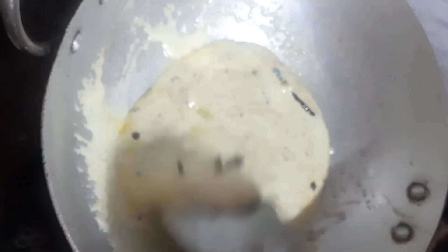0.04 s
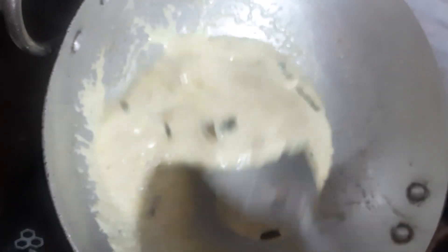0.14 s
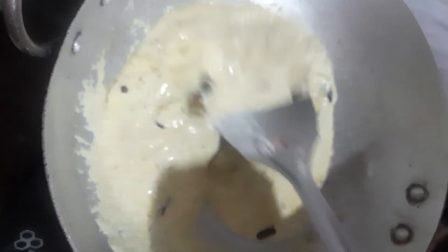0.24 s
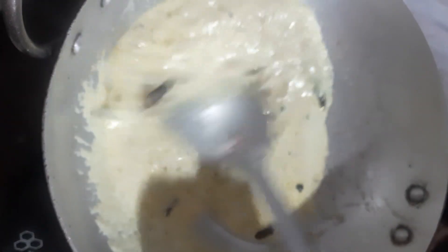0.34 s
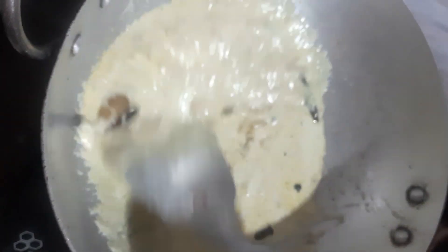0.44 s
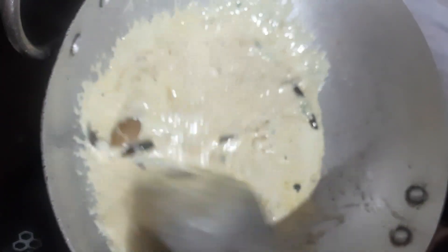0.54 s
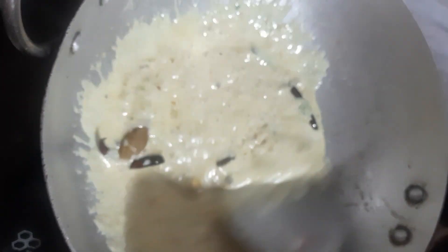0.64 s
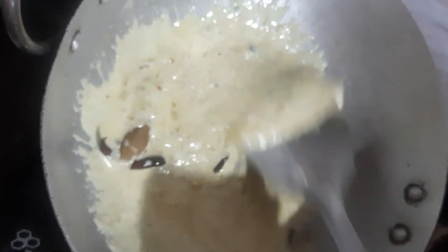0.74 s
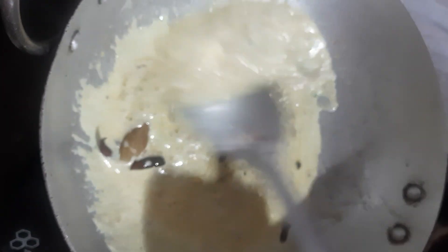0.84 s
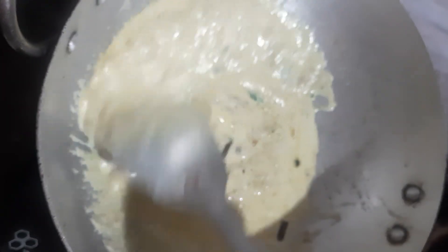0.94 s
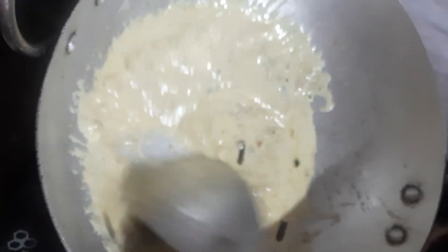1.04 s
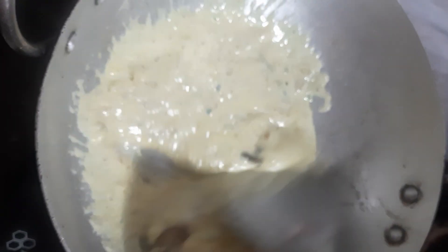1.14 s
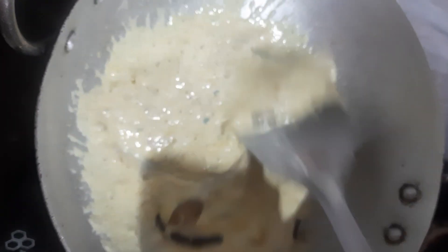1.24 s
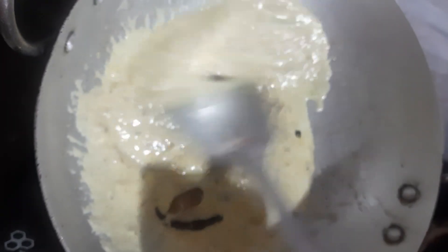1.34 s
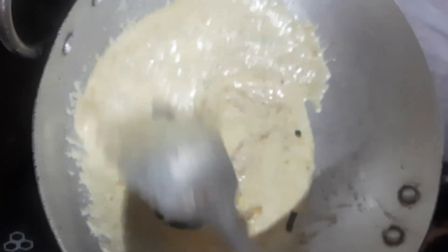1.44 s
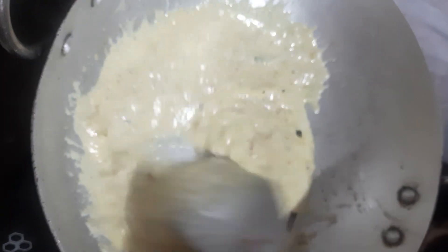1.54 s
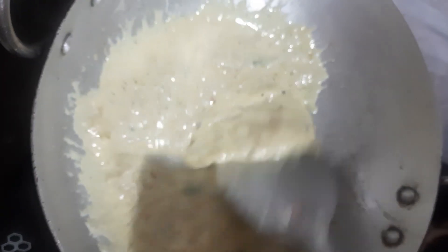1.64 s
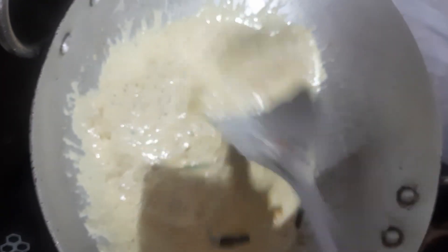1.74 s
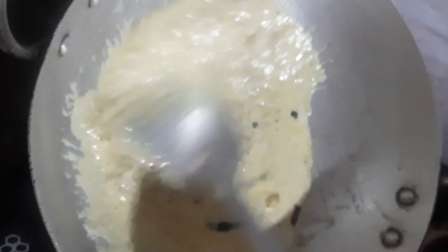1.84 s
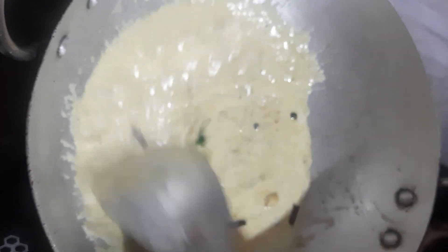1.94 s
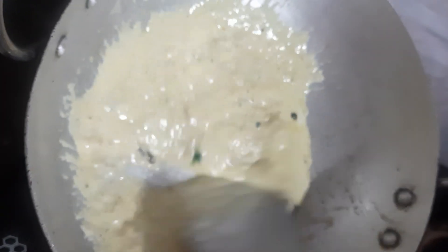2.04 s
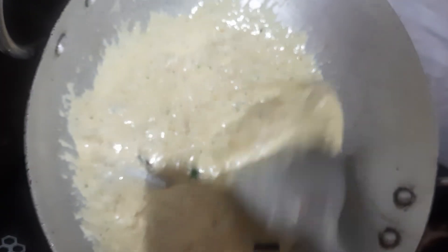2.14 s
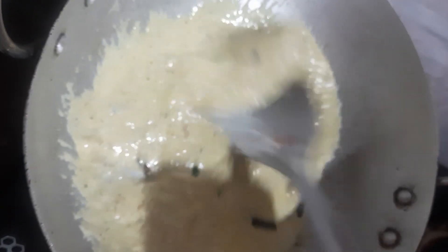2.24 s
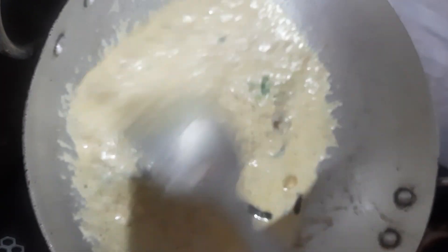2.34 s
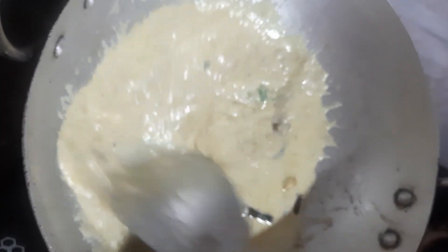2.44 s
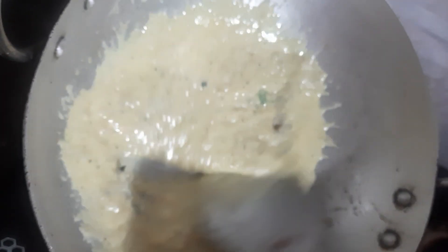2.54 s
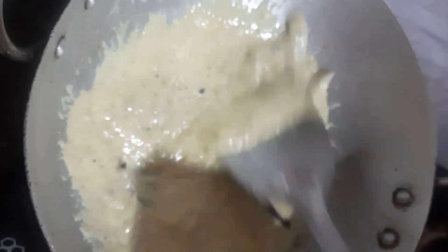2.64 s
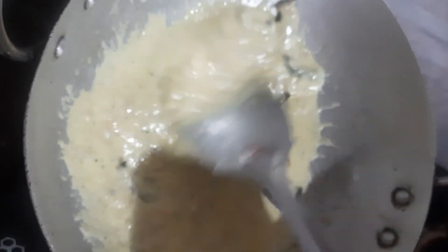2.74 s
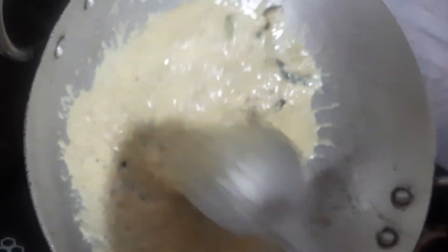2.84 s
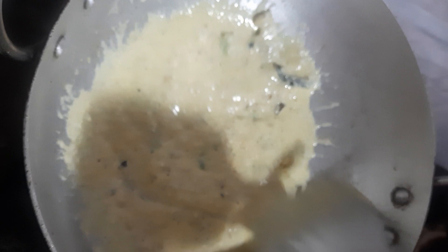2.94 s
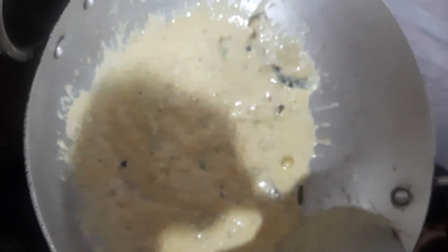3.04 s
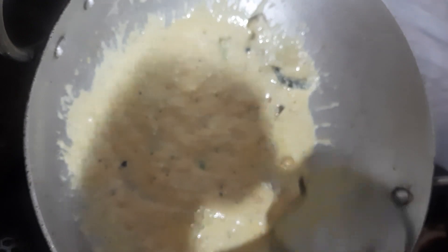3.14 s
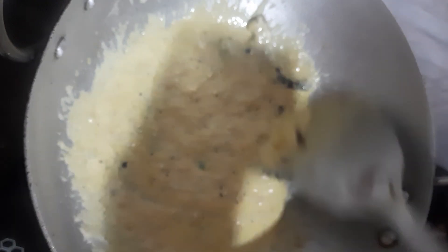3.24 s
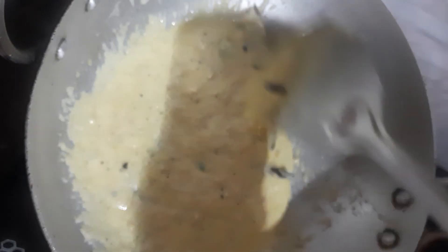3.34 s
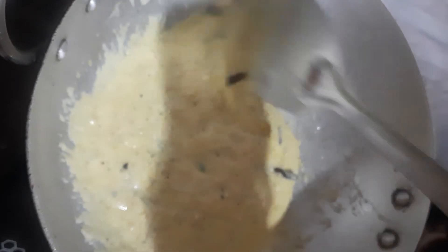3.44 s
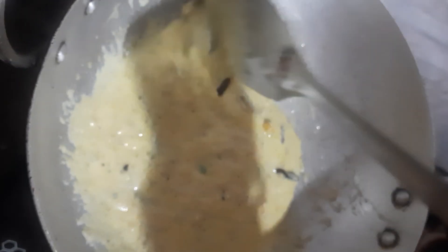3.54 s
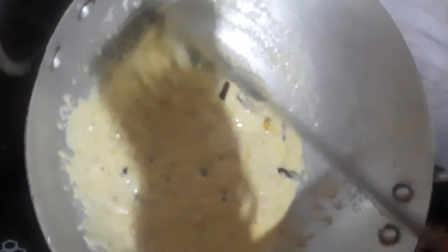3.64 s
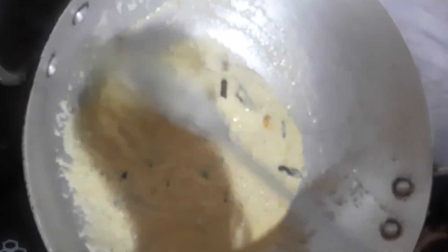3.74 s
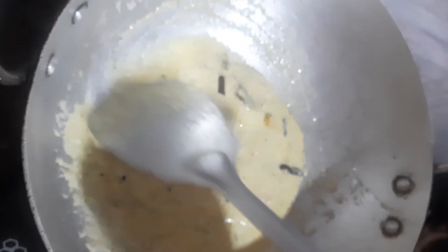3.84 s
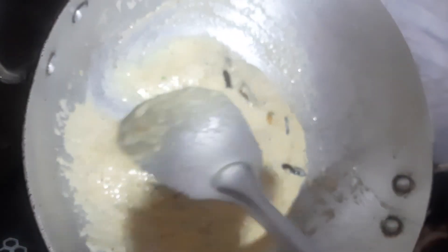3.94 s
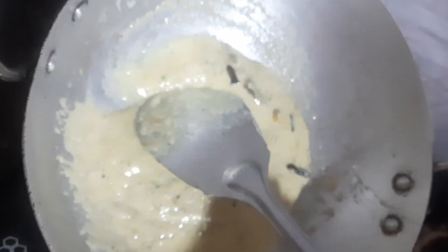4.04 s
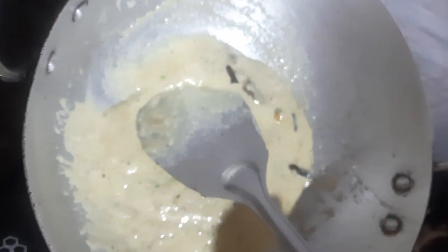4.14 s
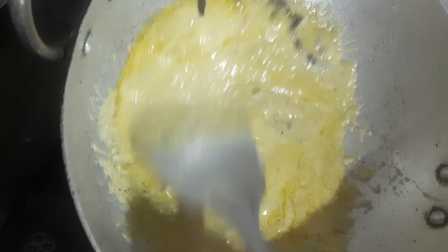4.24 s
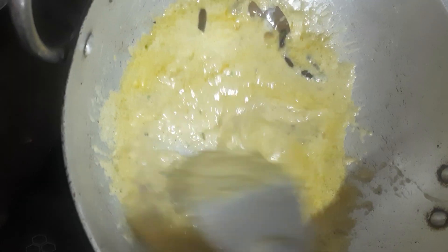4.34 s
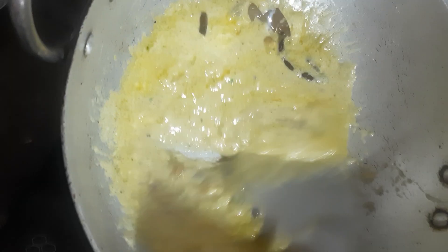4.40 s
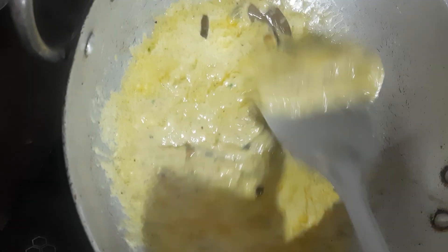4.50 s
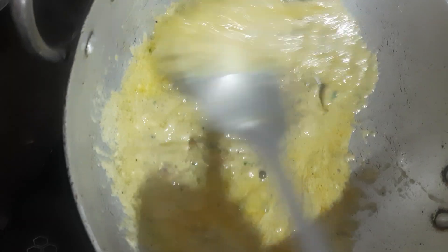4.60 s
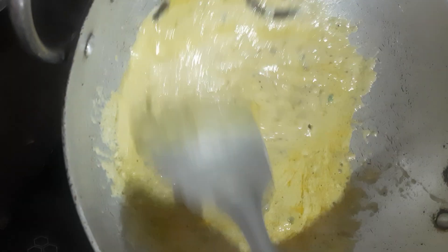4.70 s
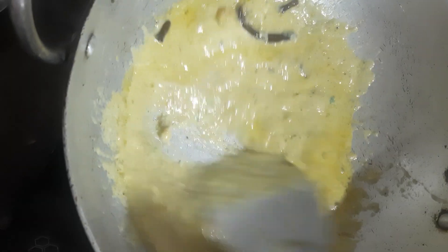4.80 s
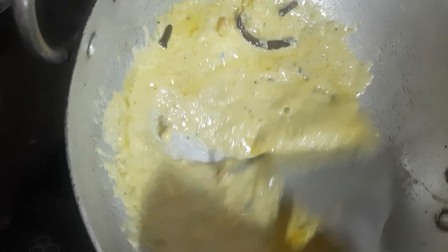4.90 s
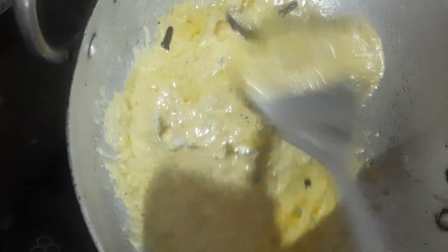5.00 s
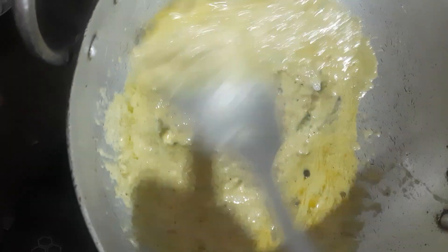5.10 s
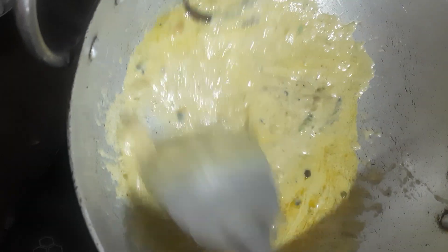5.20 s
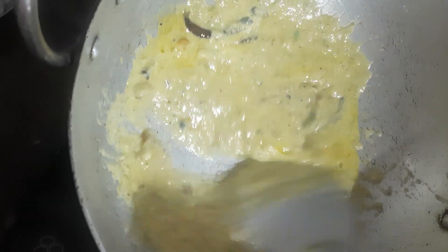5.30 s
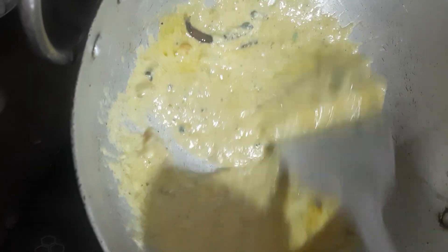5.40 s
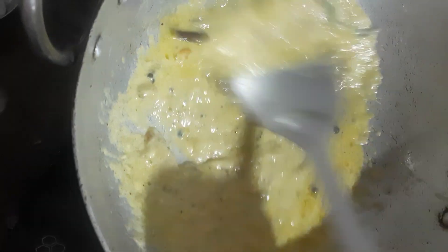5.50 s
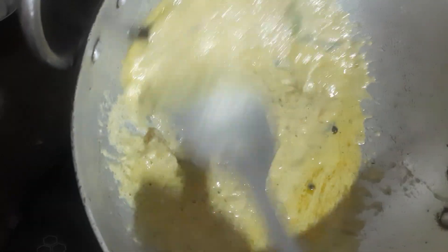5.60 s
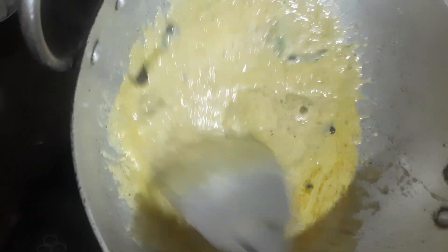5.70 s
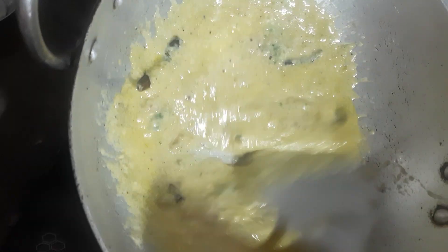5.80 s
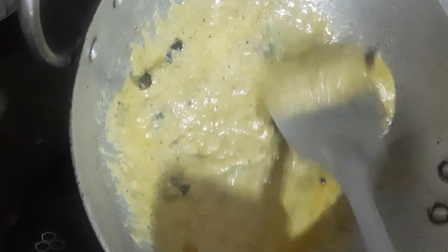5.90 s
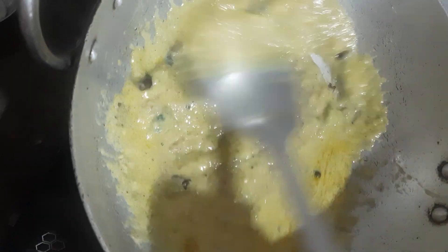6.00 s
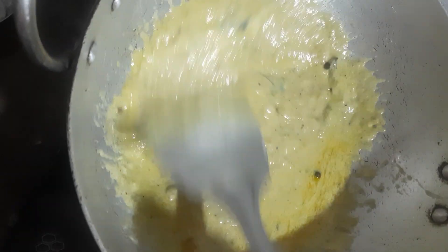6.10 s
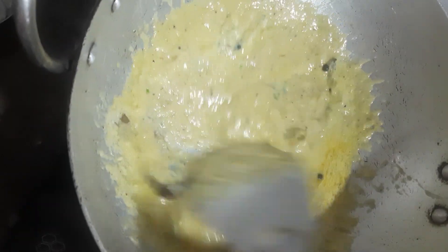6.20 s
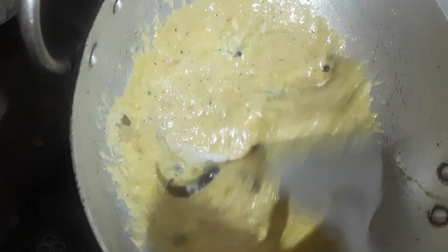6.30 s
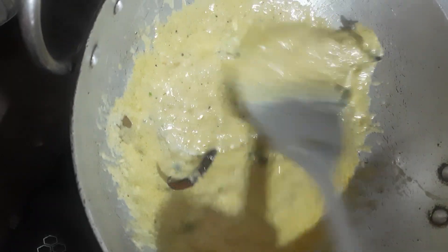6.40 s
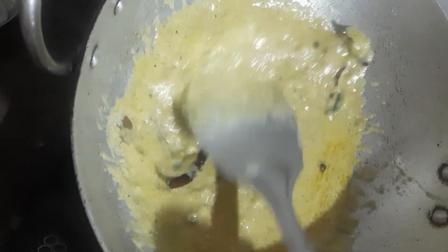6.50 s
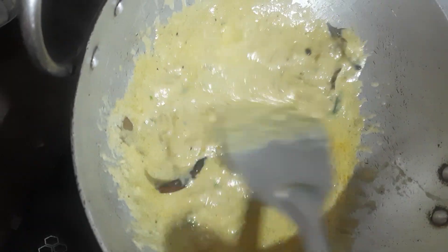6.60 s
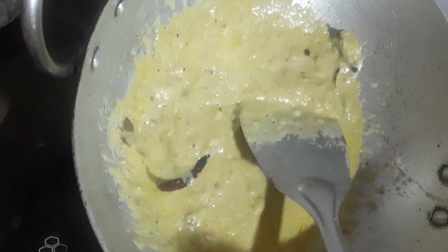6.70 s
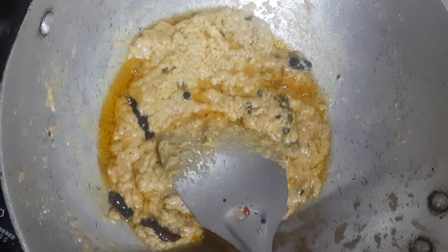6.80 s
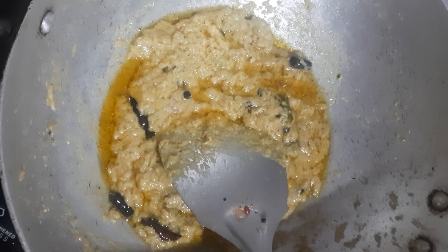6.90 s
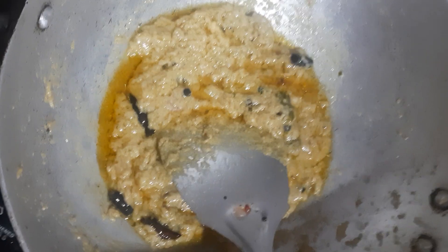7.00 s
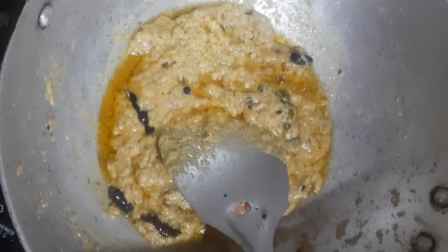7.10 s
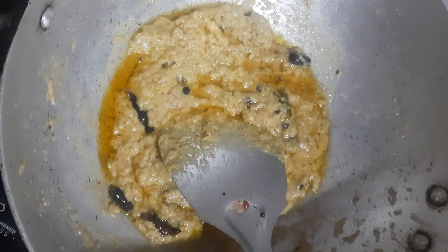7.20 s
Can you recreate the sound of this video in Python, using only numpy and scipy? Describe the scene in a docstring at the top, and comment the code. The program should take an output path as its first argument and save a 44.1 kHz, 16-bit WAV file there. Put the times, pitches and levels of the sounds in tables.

```python
"""In a kitchen, close under a pair of microphones, a steel spoon stirs a thick paste in a round metal pan.
Stick-slip friction and knocks excite the resonant modes of bowl and blade; the edge also rasps without ringing.
Air pockets pop as decaying sine pulses. Behind them a burner roars low, as spectrally shaped noise, and
bubbles sizzle faintly as shaped trains of random impulses. Near the end the sound cuts abruptly to a louder,
steady frying hiss, shaped noise switched on at full level."""
import sys
import numpy as np
from scipy import signal
from scipy.fft import rfft, irfft, next_fast_len
from scipy.io import wavfile
from scipy.ndimage import uniform_filter1d, map_coordinates

SR = 44100
rng = np.random.default_rng(int(sys.argv[2]) if len(sys.argv) > 2 else 0)


def store_wav(level_fs):
    """Save 16-bit WAV to argv[1]."""
    pcm = np.round(np.clip(np.atleast_2d(level_fs), -1, 1) * 32767)
    wavfile.write(sys.argv[1], SR, pcm.T.astype(np.int16))


N = 319783

# Strokes of the spoon: landing t/s, length/s, relative levels of the scrape of the edge/dB, of the weight on
# the bowl/dB and of the edge felt by the bowl/dB, swell from landing to lift/dB, favoured upper bowl pitch f/Hz
STROKE_ROWS = [(0, 0.1, -42, -45, -38, 4, 1580), (0.096, 0.12, -41, -46.5, -37.5, 2, 860),
               (0.208, 0.099, -41, -38.5, -35.5, -10.5, 1000), (0.283, 0.16, -51.5, -55.5, -52, 6.5, 1210),
               (0.469, 0.098, -53, -43, -49.5, -1, 830), (0.577, 0.1, -42.0, -44.5, -50.5, -8.5, 1380),
               (0.727, 0.2, -44.5, -46.5, -39.5, -5, 1150), (0.93, 0.11, -47.5, -44.5, -47, 8.5, 1140),
               (1.1, 0.012, -40.5, -44, -54, 1, 1434), (1.122, 0.025, -37, -41.5, -45, 1, 1410),
               (1.202, 0.18, -42, -43, -43, 2, 1230), (1.399, 0.071, -44.5, -49.5, -48, 6.5, 1810),
               (1.494, 0.17, -38.5, -40.5, -48.5, -3, 1220), (1.676, 0.098, -40.5, -45, -41, 6, 1630),
               (1.759, 0.048, -41, -36.5, -30.5, -7, 1200), (1.82, 0.089, -43, -53, -56, -1.5, 1340),
               (1.915, 0.15, -59.5, -43.5, -52, -2.5, 846), (2.076, 0.085, -44, -46, -67, -10, 1370),
               (2.148, 0.22, -44, -43, -42.5, -6.5, 1220), (2.451, 0.1, -41, -39.5, -47.5, -8, 1000),
               (2.575, 0.12, -46.5, -46.5, -65, 6, 1270), (2.66, 0.12, -38.5, -44.5, -38.5, -1.5, 1280),
               (3.081, 0.012, -27, -31.5, -26, -2.5, 1920), (3.093, 0.024, -46, -36, -22.5, -7, 2000),
               (3.133, 0.11, -40.5, -42, -34.5, -3, 1370), (3.234, 0.14, -38, -43.5, -31.5, 2, 1040),
               (3.383, 0.16, -37, -43, -29.5, -5, 857), (3.537, 0.028, -39, -20.5, -25, 0, 1010),
               (3.584, 0.083, -41.5, -24, -22, 4, 1080), (3.711, 0.052, -44, -39, -30, -6, 950),
               (3.801, 0.17, -42.5, -44, -41.5, -5.5, 1160), (4.175, 0.038, -43, -39, -45, -9, 1480),
               (4.36, 0.043, -73, -67, -79, -6, 1150), (4.566, 0.044, -47.5, -41.5, -45, -7.5, 920),
               (4.626, 0.13, -47, -43, -49.5, 6.5, 920), (4.799, 0.2, -38, -40.5, -43, 6, 925),
               (4.951, 0.21, -39, -41.5, -39, -2.5, 1620), (5.197, 0.04, -50, -33, -48, -17, 1330),
               (5.296, 0.055, -43.5, -45, -55, 6.5, 950), (5.374, 0.057, -39.5, -41.5, -40.5, 3, 1300),
               (5.453, 0.049, -46, -42.5, -38.5, -12, 1220), (5.573, 0.031, -59.5, -55, -54, 0, 1200),
               (5.635, 0.062, -59, -46, -50.5, -2.5, 775), (5.736, 0.036, -51, -44.5, -58, 7, 1340),
               (5.782, 0.05, -36.5, -42.5, -40, -10, 1190), (5.833, 0.064, -35, -39, -34.5, 0, 1090),
               (5.953, 0.019, -41, -47, -41, -16, 1330), (6.037, 0.06, -43.5, -45, -45.5, 6.5, 1320),
               (6.168, 0.036, -57, -34.5, -51, -14.5, 910), (6.239, 0.099, -58, -56, -67, 10, 920),
               (6.34, 0.11, -57, -42, -50, -14, 930), (6.687, 0.03, -64.0, -48.5, -51.5, -7, 860),
               (6.767, 0.021, -40, -43, -47, -27, 1290), (6.799, 0.029, -55, -55, -57, 0, 1240.0),
               (6.963, 0.015, -55.5, -55, -53.5, -6, 1200)]
SCRAPE, WEIGHT, EDGE = 2, 3, 4  # level columns of the strokes
# Knocks and catches of the spoon: t/s, relative tick level/dB, relative thud level/dB
KNOCK_ROWS = [(0.0502, -21, -16), (0.163, -34, -22), (0.193, -34, -22), (0.214, -32, -13),
              (0.2305, -23, -9), (0.5524, -25.5, -56), (1.1006, -24, -43), (1.133, -28, -27),
              (1.204, -23, -50), (1.3, -21.5, -20), (1.462, -21, -49), (1.7685, -41, -9),
              (1.976, -25.5, -34), (2.0789, -24.5, -37), (2.36, -19.5, -55), (2.4398, -28, -45),
              (2.579, -20, -26), (2.701, -33, -12.5), (2.9303, -62, -43.5), (2.9712, -42, -66),
              (3.0862, -5.5, -18), (3.099, -9.5, -44), (3.1432, -17, -45), (3.396, -18.5, -14),
              (3.437, -24, -13), (3.488, -31, -13), (3.525, -36, -14), (3.549, -16, -4), (3.559, -12, -11),
              (3.642, -19, -11), (3.8026, -35, -31), (4.112, -25, -42), (4.1824, -10.5, -30),
              (4.2, -17, -43), (4.215, -15.5, -49), (4.31, -36, -49), (4.4387, -36, -68), (4.564, -33, -26),
              (4.633, -21.5, -38), (4.8466, -24, -19), (5.0383, -31, -11), (5.2137, -20, -20),
              (5.2838, -26, -29), (5.3237, -42, -20), (5.3353, -22.5, -45), (5.384, -18.5, -30),
              (5.5747, -29.5, -44), (5.6462, -48, -33), (5.7506, -48, -27.5), (5.782, -19, -18),
              (5.9618, -25, -21), (6.0437, -26, -57), (6.1775, -29, -28.5), (6.2455, -36, -35),
              (6.352, -38, -26), (6.57, -39, -63), (6.693, -61, -39), (6.7691, -19, -47), (6.831, -42, -46),
              (6.9698, -38, -37)]
TICK, THUD = 1, 2  # level columns of the knocks
# Contact with the bare pan wall: t/s, share of the contact (0 to 1)
BARE_WALL = [(0, 0), (3, 0), (3.05, 1), (3.52, 1), (3.55, .2), (3.78, .2), (3.82, .7), (4.05, .7), (4.1, 0),
             (7.25, 0)]

LIFT_DB_PER_S, SETTLE_DB_PER_S = 325.5, 164  # the edge lifts off fast, the paste settles slower


def bowl():
    """Forced resonance: weight drives the deep modes of the pan, the edge the upper ones near its contact pitch."""
    # Modes of the bowl: f/Hz, width/Hz, relative level under paste/dB, relative level on the bare wall/dB
    bowl_modes = [(172, 14, -3, -12), (198, 20, 4, 10), (290, 16, -3, -8), (378, 24, 4.5, 2),
                  (417, 15, -4, -12), (540, 48, -6, -8), (585, 30, -6, -10), (620, 35, -4, -2),
                  (719, 150, -6, -18), (775, 45, 4, 7), (850, 90, -3, -10), (940, 50, -3, -12),
                  (1000, 35, 3, -6), (1130, 44, 3, 2), (1175, 55, -1, 6), (1230, 200, -5, -18),
                  (1370, 90, -2, -7), (1510, 60, -5, 3), (1500, 465, -11, -20), (1620, 70, -3, -1),
                  (1805, 55, -4, -1), (1910, 70, -10, -6), (2050, 80, -6, -5), (2190, 70, -8, -7)]
    heavy_hz, heavy_octaves, heavy_top_db, heavy_from_db = 535, 0.11, 12, -28
    place_top_db, place_octaves = 9, 0.42  # lift and reach of the favoured pitch
    wander_db = 2.5

    slips = grit(4000, 2.5, 3.1)
    thuds = gain_of(2.5) * blows(THUD, t60=0.011, rise=0.00045)
    slips = slips + gain_of(-4) * grit(90, 4, 2)  # sparse, stronger random snaps of the friction
    favoured_hz = place()
    load = drag(WEIGHT, SETTLE_DB_PER_S)
    heaviness = load / (load + gain_of(heavy_from_db))

    def heavy_db(hz):
        """Load-dependent response: a heavy drag brings out the bowl near one deep pitch."""
        return heavy_top_db * heaviness * np.exp(-(np.log2(hz / heavy_hz) / heavy_octaves) ** 2)

    def near_db(hz):
        """Position-dependent coupling: modes near the favoured pitch are lifted, more so on the bare wall."""
        closeness = np.exp(-(np.log2(hz / favoured_hz) / place_octaves) ** 2)
        return place_top_db * (1 + 0.73 * curve(BARE_WALL)) * closeness

    weight = load * slips + gain_of(-12.5) * thuds
    edge = drag(EDGE, LIFT_DB_PER_S) * slips + gain_of(-2.5) * thuds
    edge = edge + gain_of(-22.0) * blows(TICK, t60=0.048, rise=0.0015)
    # the paste is pushed without ringing
    band = signal.butter(N=2, Wn=[130, 900], btype="band", fs=SR, output="sos")
    pushed = gain_of(8.5 - 2.7 * curve(BARE_WALL)) * signal.sosfilt(band, weight)
    deep = body(weight, bowl_modes[:8], wander_db, heavy_db)
    upper = body(edge, bowl_modes[8:], wander_db, near_db)
    return deep + upper + pushed


def blade():
    """Stick-slip excitation: pressure turns the rasp into ringing of the spoon; ticks crack, hard ones clank."""
    # Modes of the spoon blade: f/Hz, width/Hz, relative level in paste/dB, relative level on the bare wall/dB
    blade_modes = [(2100, 120, -5, -6), (2420, 110, 1, -10), (2640, 90, -6, -5), (3000, 70, -12, -4),
                   (3290, 90, -10, -4), (3975, 110, -6, 1), (4190, 90, 2, -14), (4790, 100, -5, -1),
                   (5190, 120, 1, -12), (5620, 160, -10, 0), (5870, 90, -14, -4), (6250, 100, -12, -5),
                   (6870, 80, 4, 2), (7600, 250, -10, -9), (8600, 200, -10, -14), (11000, 250, -11, -12),
                   (12000, 400, -14, -14)]
    # Spectrum of the unringing scrape and crack: f/Hz, relative level/dB
    rasp_spectrum = [(760, -26), (1300, 2.5), (2060, 2.5), (2590, 6), (2910, 1.5), (3330, 3.5), (4060, 0.5),
                     (6710, 3), (9270, -9.5), (12200, -5), (15800, -7.5)]
    # softer ticks are smothered by the paste; in harder ones the ring outgrows the crack
    clank_from_db, crack_top_db = -22, -13
    wander_db = 2

    pressure = gain_of(-2.5) * drag(SCRAPE, LIFT_DB_PER_S)
    slips = grit(15000, 3.5, 1.58) + gain_of(-8.0) * grit(150, 4, 2)  # dense slips and sparse snaps
    hard = pressure / (pressure + gain_of(-30))  # 0 light, towards 1 hard
    ticks = blows(TICK, t60=0.021, rise=.0001, knee_db=clank_from_db)
    crack = coloured(blows(TICK, t60=0.03, rise=.0001, top_db=crack_top_db), rasp_spectrum)
    force = gain_of(-8.5) * pressure * (1 + 2 * hard) * slips + gain_of(-3.0) * ticks
    rasp = gain_of(11.0) * pressure * (1 - hard) * patchy(coloured(slips, rasp_spectrum), 1.3)
    return rasp + body(force, blade_modes, wander_db) + gain_of(-6.5) * crack


def pops():
    """Bubble bursting: each air pocket gives a sine pulse that starts at once and decays exponentially."""
    # Pockets of air burst under the blade: t/s, level/dB, f/Hz
    pockets = [(0.2334, -27, 335), (0.2655, -23, 344), (4.3024, -33, 262), (5.2864, -28, 302),
               (5.9655, -28, 197), (6.1792, -19, 305), (6.246, -37, 450)]
    t60 = 0.026  # s
    out, t = np.zeros(N), np.arange(2000) / SR
    for start, db, hz in pockets:
        pulse = gain_of(db - 60 * t / t60) * np.sin(2 * np.pi * hz * t)
        out[round(start * SR):][:2000] += pulse
    return out


def body(force, modes, wander_db, place_db=lambda hz: 0):
    """Modal superposition: a wandering contact shares the force among modes heard unequally at the two sides."""
    bare = curve(BARE_WALL)
    shares = []
    for hz, width, paste_db, bare_db in modes:
        level_db = paste_db + bare * (bare_db - paste_db)
        wander = (1.5 - bare / 2) * wander_db * drift(hz=9)
        shares.append(gain_of(level_db + wander + place_db(hz)))
    # noise power passed by a mode grows with its width
    power = sum(share ** 2 * mode[1] for share, mode in zip(shares, modes))
    total = np.sqrt(power * np.pi / SR)
    out = np.zeros((2, N))
    for k, (hz, width) in enumerate(mode[:2] for mode in modes):
        side = gain_of(3 * drift(hz=3))
        sign = (-1) ** k
        ringing = sign * ring(force * shares[k] / total, hz, width)
        out += [ringing * side, ringing / side]
    return out


def ring(x, hz, width):
    """Resonance: two equal second-order peaks in series give one mode steep skirts and gain 1 at its peak."""
    b, a = signal.iirpeak(hz, hz / width * 2 / 3, SR)
    return signal.lfilter(b, a, signal.lfilter(b, a, x))


def grit(per_s, spread_db, lumps_db):
    """Stick-slip friction: a random train of uneven impulses, in lumps, as the edge jumps over rough metal."""
    size = gain_of(spread_db * np.minimum(rng.exponential(1, N), 4)) * rng.choice([-1., 1.], N)
    slipping = rng.random(N) < per_s / SR
    return evened(size * slipping * gain_of(lumps_db * drift(hz=49.47)))


def blows(column, t60, rise, knee_db=-200, top_db=200):
    """Impact: each knock is a noise burst that builds and decays; force fades below the knee, saturates at the top."""
    rows = np.asarray(KNOCK_ROWS)
    force = gain_of(rows[:, column])
    train = np.zeros(N)
    struck = np.round(rows[:, 0] * SR).astype(int)
    train[struck] = force / (1 + gain_of(knee_db) / force) / (1 + force / gain_of(top_db))
    t = np.arange(4000) / SR
    burst = gain_of(-60 * t / t60) * (1 - np.exp(-t / rise))  # t60 and rise in s
    return signal.oaconvolve(train, burst)[:N] * rng.standard_normal(N)


def drag(column, fall_db_per_s):
    """Power addition: the gains of all strokes combine as the root of their summed squares."""
    power = sum(contact(stroke, column, fall_db_per_s) ** 2 for stroke in STROKE_ROWS)
    return np.repeat(np.sqrt(power), repeats=32)[:N]


def contact(stroke, column, fall_db_per_s):
    """Contact envelope of one stroke: landing, a swell while it drags, an exponential fall after the lift."""
    knock_rise_s, slide_in_s = 0.0011, 0.038  # at once where the spoon knocks down, gently where it slides in
    start, length, swell_db = stroke[0], stroke[1], stroke[5]
    now = np.arange(0, N, 32) / SR  # one value every 32 samples
    knock = min((row[0] for row in KNOCK_ROWS), key=lambda s: abs(s - start))
    if abs(knock - start) < .012:
        landing = (now - knock) / knock_rise_s
    else:
        landing = (now - start) / slide_in_s
    t = now - start
    swell = swell_db * (np.clip(t / length, 0, 1) - .5)
    fall = fall_db_per_s * np.maximum(t - length, 0)
    landed = np.clip(landing, 0, 1) if start > 0 else 1  # the first stroke is already under way
    return landed * gain_of(stroke[column] + swell - fall)


def place():
    """Moving excitation point: the favoured pitch glides from the middle of one stroke to that of the next."""
    rows = np.asarray(STROKE_ROWS)
    return np.interp(np.arange(N) / SR, rows[:, 0] + rows[:, 1] / 2, rows[:, 6])


def patchy(x, patch_db):
    """Shading and reflection by paste and wall: phase and level vary in time-frequency patches, unlike per side."""
    z = signal.stft(x, nperseg=256, noverlap=192)[2]
    patches = rng.standard_normal((3,) + z.shape)  # two for the sides, one in common
    patches = uniform_filter1d(uniform_filter1d(patches, size=4, axis=1), size=40, axis=2)
    patches = evened(patches)
    turn = np.exp(1.49 * 1j * patches[:2])
    shade = gain_of(patch_db * (patches[2] + 0.53 * patches[1::-1]))
    return signal.istft(z * turn * shade, nperseg=256, noverlap=192)[1][:, :N]


def kitchen(x, t60, level_db):
    """Reverberation: sparse decaying reflections from pan wall, counter and tiles, different at each microphone."""
    t = np.arange(9000) / SR
    taps = rng.standard_normal((2, 9000)) * (rng.random((2, 9000)) < .06)
    taps = taps * gain_of(-60 * t / t60) * (t > .0008)
    taps = taps / np.linalg.norm(taps, axis=1)[:, None]
    return gain_of(level_db) * signal.oaconvolve(x[None], taps, axes=1)[:, :N]


def burner():
    """Turbulence noise: a lumpy low roar, strongly correlated between the two microphones."""
    # Spectrum of the roar: f/Hz, relative level/dB per Hz
    roar_spectrum = [(15, -39), (30, -41.5), (48, -3.5), (102, -1.5), (140, -9.5), (173, -3.5), (198, -20),
                     (292, -14.5), (401, -24), (900, -41), (1170, -102), (1980, -120)]
    # Course of the flame: t/s, relative roar level/dB
    flame_level = [(0, -51.5), (1, -50.5), (2.8, -49.5), (3.1, -53), (4.1, -52.5), (4.4, -52.5), (5.2, -49),
                   (6.2, -54), (6.8, -52), (7.25, -60.5)]
    common, apart = rng.standard_normal(N), rng.standard_normal((2, N))
    roar = evened(coloured(common + 0.25 * apart, roar_spectrum))
    return gain_of(curve(flame_level) + 7.5) * roar


def sizzle():
    """Random superposition: tiny bubbles burst all over the paste; after a cut, a loud steady frying hiss."""
    # Spectrum of the bubbles: f/Hz, relative level/dB per Hz
    bubble_spectrum = [(240, -40), (400, -7.5), (467, -42.5), (528, -9), (707, -18), (2570, -21.5),
                       (3500, -24), (5900, -24.5), (15800, -33)]
    # Spectrum of the frying hiss: f/Hz, relative level/dB per Hz
    frying_spectrum = [(240, -63), (400, -20), (597, -5), (1010, -15), (1500, -9), (3340, -12),
                       (3780, -6.5), (6780, -4.5), (15800, -14.5)]
    bubbles_db, frying_db, frying_start_s = -60, -40.5, 7.084
    bubbles = np.array([grit(9000, 4, 2), grit(9000, 4, 2)])
    hiss = coloured(rng.standard_normal(N) + 2.8 * rng.standard_normal((2, N)), frying_spectrum)
    side_db = np.array([[-1.2], [1.2]])  # left, right
    after_cut = np.arange(N) > frying_start_s * SR
    hiss = gain_of(frying_db + side_db) * evened(hiss) * after_cut
    return gain_of(bubbles_db) * evened(coloured(bubbles, bubble_spectrum)) + hiss


def gain_of(db):
    """Level law: amplitude ratio of a level in dB."""
    return 10 ** (np.asarray(db) / 20)


def evened(x):
    """Power normalisation: scales a signal to rms 1."""
    return x / np.sqrt(np.mean(x ** 2) + 1e-20)


def curve(rows, column=1):
    """Linear interpolation: one column of a time table, sample by sample."""
    rows = np.asarray(rows)
    return np.interp(np.arange(N) / SR, rows[:, 0], rows[:, column])


def coloured(x, points):
    """Linear filtering: multiplies the spectrum by gains interpolated over log frequency from (Hz, dB) points."""
    size = next_fast_len(N)
    hz = np.fft.rfftfreq(size, 1 / SR)
    f, db = np.transpose(points)
    gain = gain_of(np.interp(np.log(hz + 1), np.log(f + 1), db))
    return irfft(rfft(x, size) * gain, size)[..., :N]


def drift(hz):
    """Slow random fluctuation: straight lines between hz chance values a second, rms about 1."""
    knots = rng.standard_normal(400)
    return np.interp(np.arange(N) / SR * hz, np.arange(400), knots) * np.sqrt(3 / 2)


def scene():
    """Superposition: pan and spoon placed by interchannel delay and level, plus reflections and background."""
    # Base delay of left after right: t/s, delay/s
    side_delay = [(0, 0.00017), (0.5, 0.00022), (3.1, 0.00021), (3.4, 0.00019), (3.7, 0.00013),
                  (4.1, 0.00013), (4.5, 0.0001), (7.25, 0.00016)]
    # Level of left minus right for the pan: f/Hz, level difference/dB
    side_level = [(60, 1), (180, -2), (550, -4), (1650, -1), (4970, -3), (15000, -7.5)]
    low, high = bowl() + pops(), blade()
    near = low + high
    lag = curve(side_delay) + .00004 * drift(hz=5.8)  # the spoon sweeps from side to side
    late = map_coordinates(near[0], [np.arange(N) - lag * SR], order=3, mode="nearest")
    pan = np.array([late, near[1]])
    pan = pan + kitchen(low[1], 0.037, -8.0) + kitchen(high[1], 0.18, -7.5)
    lean = np.asarray(side_level)
    # half of the level difference goes to each side
    pan = np.array([coloured(pan[0], lean * [1, .5]), coloured(pan[1], lean * [1, -.5])])
    return pan + burner() + sizzle()


def record(dry):
    """Band limitation: a linear-phase low-pass filter removes the highest treble."""
    edge_hz = 15780
    lowpass = signal.firwin(611, edge_hz, window=("kaiser", 9), fs=SR)
    return signal.oaconvolve(dry, lowpass[None], "same")


dry = scene()
out = record(dry)
store_wav(out)
```